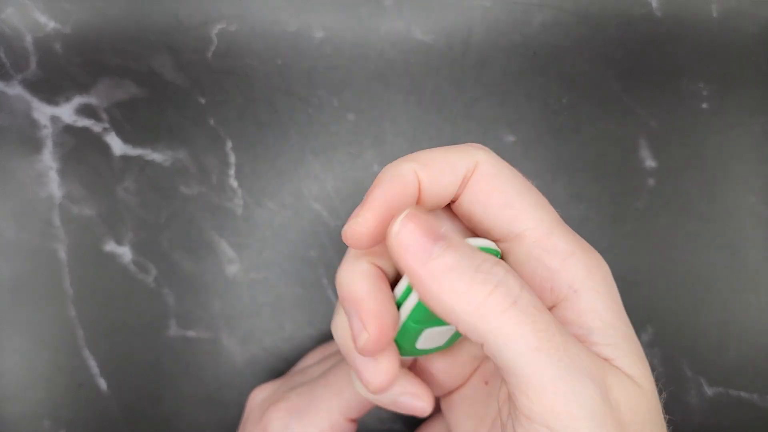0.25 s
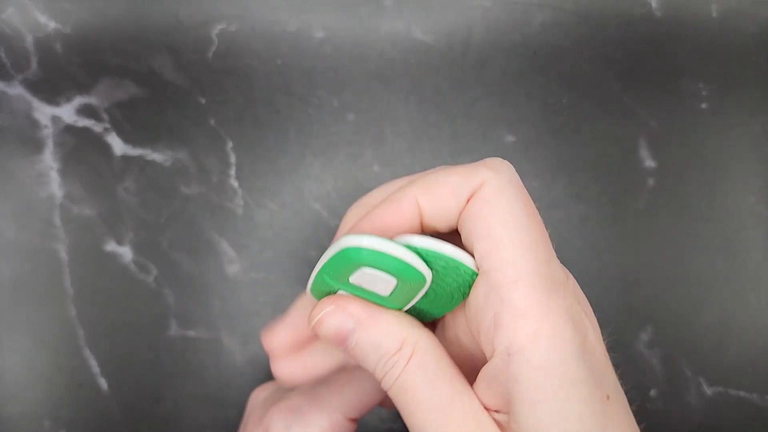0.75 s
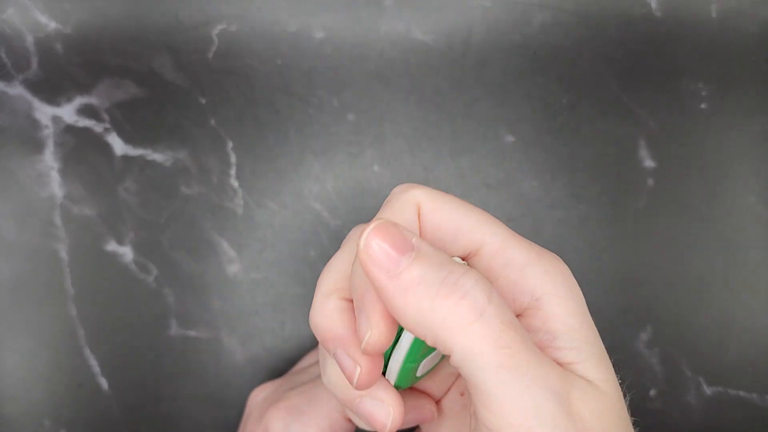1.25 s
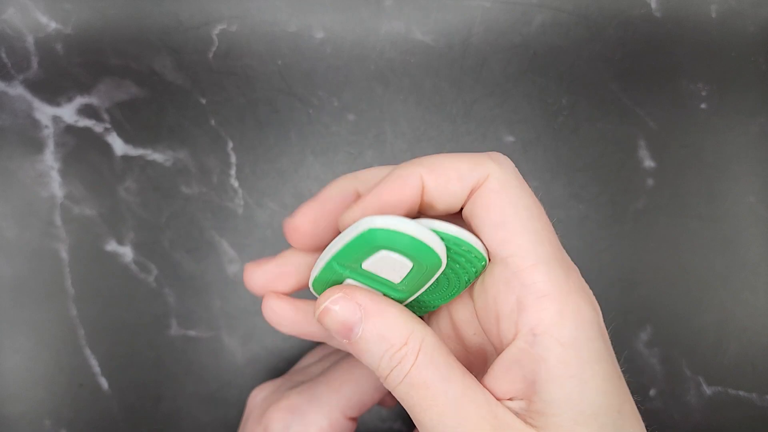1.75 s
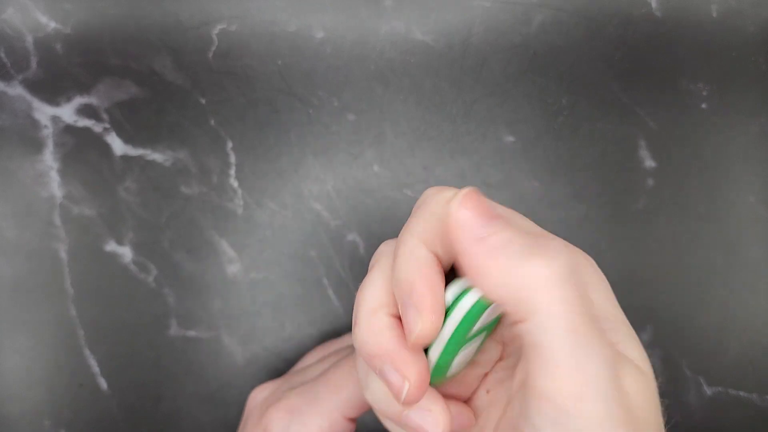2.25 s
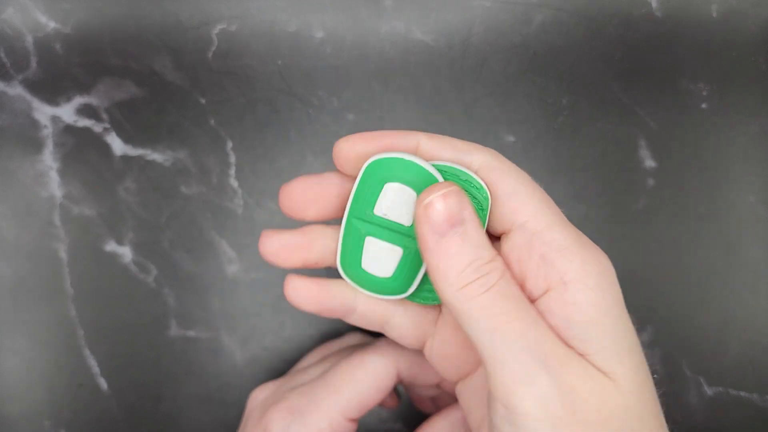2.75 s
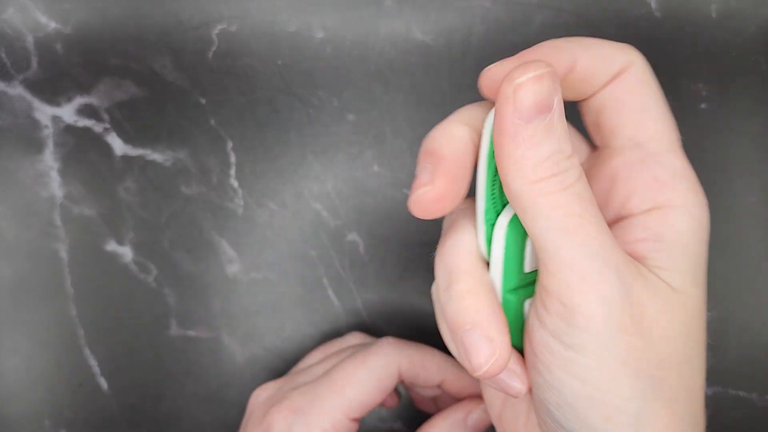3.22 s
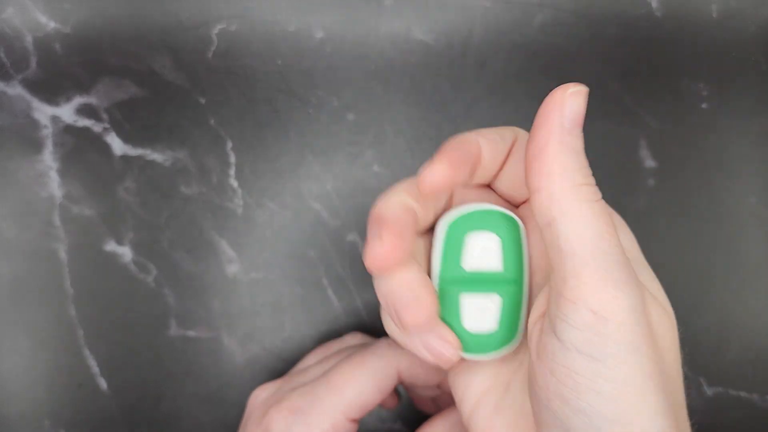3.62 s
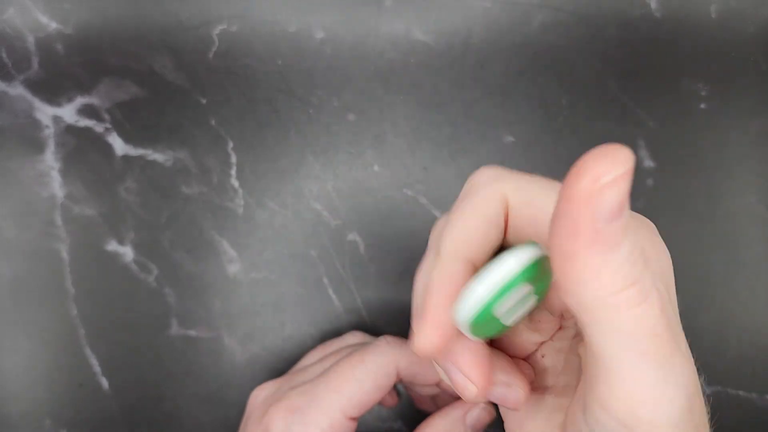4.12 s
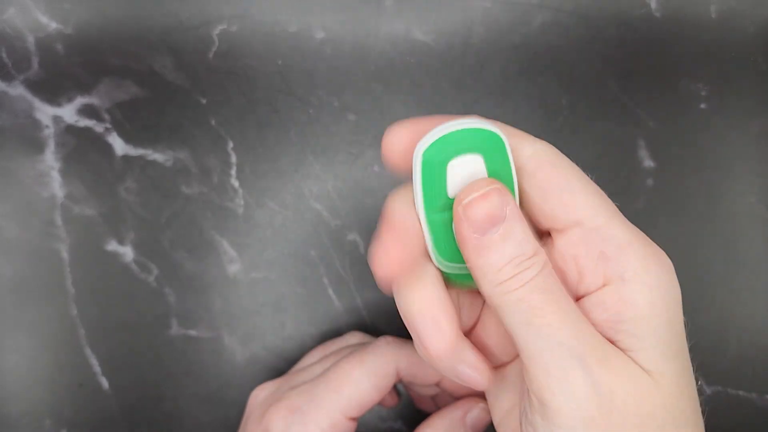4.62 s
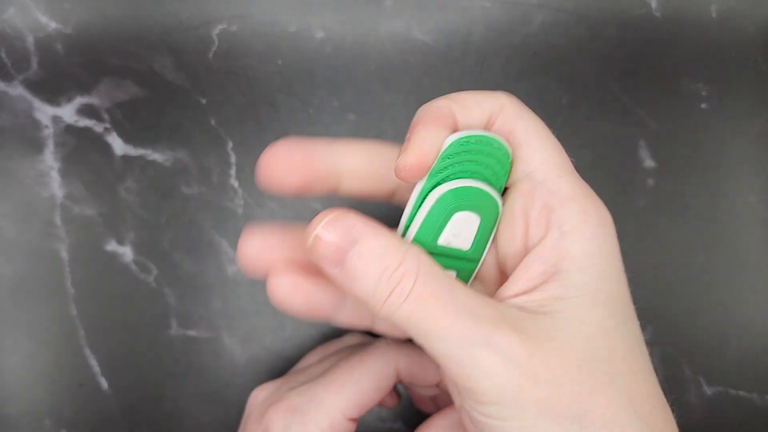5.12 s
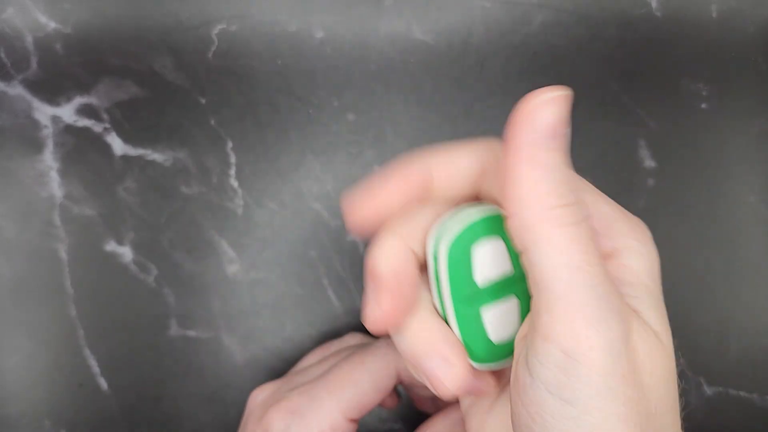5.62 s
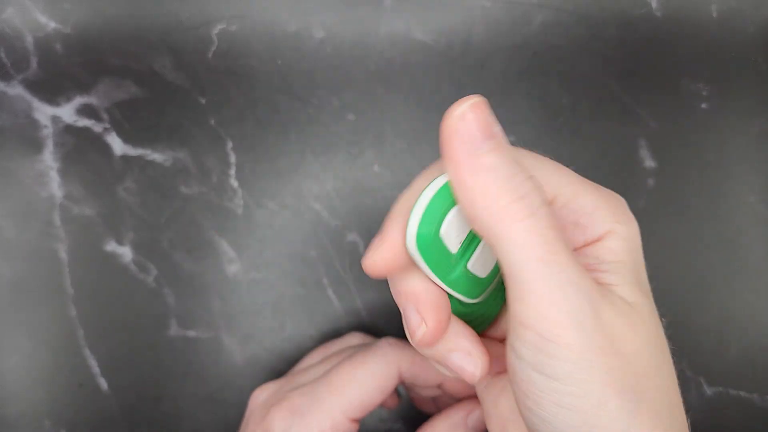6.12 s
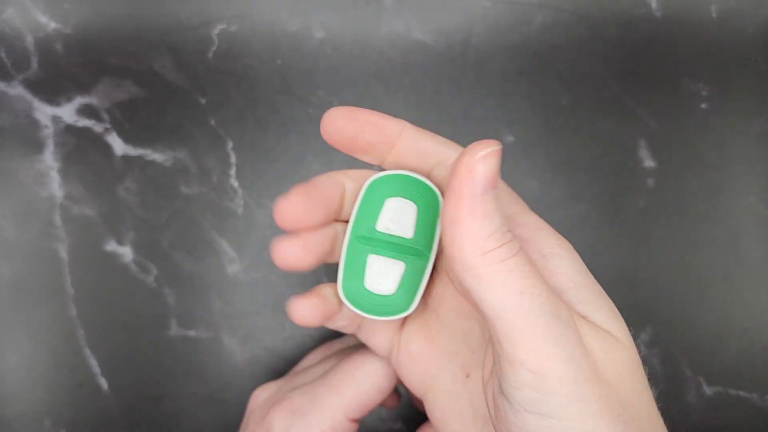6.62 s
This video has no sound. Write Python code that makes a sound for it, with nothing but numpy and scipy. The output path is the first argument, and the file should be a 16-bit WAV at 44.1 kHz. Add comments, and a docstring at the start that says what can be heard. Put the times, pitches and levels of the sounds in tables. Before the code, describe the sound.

A hand-held magnetic plastic slider snaps sharply again and again, with short scrapes and gritty rubs, close up in a small quiet room.

```python
"""Hard plastic snaps, each led in by a swelling scrape and followed by brief chatter, with gritty rubs between.
Place: a small, quiet room with a low hum. Distance: a hand's work close to a stereo microphone.
A magnetic fidget slider's ribbed plates scrape, strike and chatter: dense random contacts shaped by resonances.
The fingers rub and tick with longer or fainter strokes of the same grit. The room adds a noise-like tail;
filtered noise makes its rumble and hiss, and steady and wavering tones make the hum."""
import sys
import numpy as np
from scipy import signal
from scipy.fft import rfft, irfft, next_fast_len
from scipy.io import wavfile
from scipy.ndimage import uniform_filter1d

SR = 44100
rng = np.random.default_rng(int(sys.argv[2]) if len(sys.argv) > 2 else 0)


def wav_record(signal):
    """Record a signal, one row per channel, as 16-bit PCM in the file named by sys.argv[1]."""
    frames = np.transpose(np.atleast_2d(signal))
    bounded = np.clip(frames, -1, 1)
    # unit amplitude maps onto the largest positive 16-bit level
    quanta = np.round(bounded * 32767).astype(np.int16)
    wavfile.write(sys.argv[1], SR, quanta)


N = 302997   # length in samples


def from_db(db):
    """Decibels to amplitude gain."""
    return 10 ** (np.asarray(db) / 20)


def rms_one(x):
    """Scale to unit power."""
    return x / np.sqrt(np.mean(x ** 2) + 1e-20)


def at_hz(points, hz):
    """Read a table of (Hz, value) on a log-frequency axis."""
    points = np.array(points)
    return np.interp(np.log(hz + 1), np.log(points[:, 0]), points[:, 1])


def bins(size):
    """Frequencies in Hz of a spectrum of this many samples."""
    return np.arange(size // 2 + 1) * SR / size


def bump(hz, centre_hz, width_hz):
    """Shape of a resonance: 1 on top, one half at half the width to either side."""
    return 1 / (1 + (2 * (hz - centre_hz) / width_hz) ** 2)


def resonate(x, gain_db):
    """Causal (minimum-phase) filter with the given gain per bin, found by folding the cepstrum."""
    size = x.shape[-1]
    cepstrum = irfft(np.log(from_db(gain_db)), size)
    cepstrum[..., 1:size // 2] *= 2
    cepstrum[..., size // 2 + 1:] = 0
    response = np.exp(rfft(cepstrum))
    return irfft(rfft(x) * response, size)


def add(out, x, start_s):
    """Mix x into out from start_s on, trimming what falls outside."""
    start = int(round(start_s * SR))
    first = max(start, 0)
    last = min(start + x.shape[-1], out.shape[-1])
    if last > first:
        out[:, first:last] += x[:, first - start:last - start]


# Spectrum of the room's rumble and hiss, before its overall level is set: pitch_hz [Hz], density_db [dB per Hz]
AIR_SPECTRUM = [(20, -8), (45, -9.5), (80, -8.5), (105, -9), (150, -6), (230, -10.5), (300, -22.5),
                (400, -20), (1000, -34.5), (1550, -35), (2400, -50.5), (5500, -51.5), (10500, -61.5),
                (16000, -60.5)]
# Likeness of that noise at the two microphones: pitch_hz [Hz], correlation [0-1]
AIR_CORRELATION = [(30, 0.71), (100, 1), (180, .8), (350, 0.16), (1000, 0.093), (16000, 0.0064)]
# Tones of the distant motor: pitch_hz [Hz], level_db [dB, halfway through], steady_share [of power, 0-1]
HUM_TONES = [(59.11, -51.5, 0.87), (163.4, -61, 0.08), (348.3, -71, 0.02)]
AIR_DB = -53
HUM_FADE_DB_PER_S = .5   # the hum slowly grows fainter


def background():
    """Low rumble and faint hiss of the room as filtered noise, with the wavering hum of a distant motor."""
    size = 2 * next_fast_len(N // 2 + 1)
    hz, t = bins(size), np.arange(N) / SR
    mid, side = rfft(rng.standard_normal((2, size)))
    alike = np.clip(at_hz(AIR_CORRELATION, hz), 0, 1)
    both = np.sqrt(1 + alike) * mid + np.sqrt(1 - alike) * side * [[1], [-1]]
    air = rms_one(irfft(both * from_db(at_hz(AIR_SPECTRUM, hz)), size)[:, :N])
    hum = 0
    for pitch_hz, level_db, steady_share in HUM_TONES:
        narrow_noise = rfft(rng.standard_normal(size)) * bump(hz, pitch_hz, width_hz=13)
        waver = rms_one(irfft(narrow_noise, size)[:N])
        steady_share = np.clip(steady_share, 0, 1)
        tone = np.sqrt(2 * steady_share) * np.sin(2 * np.pi * pitch_hz * t)
        hum = hum + from_db(level_db) * (tone + np.sqrt(1 - steady_share) * waver)
    fade = from_db(-HUM_FADE_DB_PER_S * (t - t.mean()))
    return from_db(AIR_DB) * air + hum * fade


# How long the room's tail takes to fall by 60 dB, before the early boost: pitch_hz [Hz], decay_s [s]
ROOM_DECAY = [(300, 0.0152), (1500, 0.2861), (3000, 0.3453), (5000, 0.368), (8000, 0.3029), (12000, 0.2004),
              (16000, 0.199)]
# Colour of the room's tail: pitch_hz [Hz], level_db [dB]
ROOM_TONE = [(200, -5.5), (1000, -2.5), (2500, -3.5), (5000, -2.5), (9000, -4), (16000, 1.5)]


def room_response(size=32768):
    """Diffuse reflections as decaying noise bands, strongest early on from the table top."""
    t, hz = np.arange(size) / SR, bins(size)
    white = rfft(rng.standard_normal((2, size)))
    tail = 0
    edges_hz = np.linspace(80, 17000, 45)
    for low, high in zip(edges_hz, edges_hz[1:]):
        centre = (low + high) / 2
        band = irfft(white * ((hz >= low) & (hz < high)), size)
        decay_db = -60 * t / at_hz(ROOM_DECAY, centre)
        tail = tail + band * from_db(at_hz(ROOM_TONE, centre) + decay_db)
    build_up = np.clip((t - .003) / .012, 0, 1)
    early = 1 + 3.5 * np.exp(-t / 0.026)
    return tail * build_up * early / np.sqrt(SR * 0.04543)


# Resonances of the plastic plates: pitch_hz [Hz], width_hz [Hz], lift_db [dB]
PLATE_RESONANCES = [(960, 70, 3), (1519, 180, 7.5), (2300, 140, -2.5), (2900, 150, 3.5), (3400, 90, 0),
                    (3845, 52, 2.5), (4400, 67, 0.5), (4690, 30, 1.5), (5495, 260, 4), (5907, 29, 5.5),
                    (6295, 95, 4.5), (7223, 310, 6), (7687, 490, 3), (8380, 130, 6), (9407, 78, 7),
                    (11800, 69, 6.5), (13450, 300, 1.5), (14700, 120, 4.5)]


def plate_db(hz):
    """Lift in dB given by the resonances of the plates."""
    return sum(lift_db * bump(hz, pitch_hz, width_hz) for pitch_hz, width_hz, lift_db in PLATE_RESONANCES)


def contacts(size, grain_db, clump_db, channels=3):
    """Dense tiny collisions of uneven strength, bunched where the ribs catch."""
    sizes = from_db(grain_db * np.clip(rng.standard_normal((channels, size)), -2, 2))
    catches = rms_one(uniform_filter1d(rng.standard_normal(size), size=40))
    bunching = from_db(clump_db * np.clip(catches, -2.5, 2.5))
    return rms_one(rng.choice([-1, 1], (channels, size)) * sizes * bunching)


def at_microphones(x, pan_db, lag_s, scatter):
    """With a positive lag the left microphone hears first; the hand scatters sound differently to each."""
    direct = np.array([x[0], np.roll(x[0], int(lag_s * SR))])
    gains = from_db(np.array([[.5], [-.5]]) * pan_db)
    return (direct + scatter * x[1:]) * gains / np.sqrt(np.mean(gains ** 2))


# Plates and fingers rubbing: middle_s [s], length_s [s from the middle until about 10 dB down],
# level_db [dB, before the swell and fade], pitch_hz [Hz, centre of the grit before the plates colour it]
RUB_STROKES = [(0.676, 0.0052, -49.5, 5630), (1.02, 0.023, -51.5, 3900), (1.097, .003, -58, 4500),
               (1.119, .016, -53.5, 3400), (2.08, 0.0182, -48, 4106), (1.908, .005, -58, 5960),
               (2.21, 0.0325, -63, 2995), (2.768, 0.0028, -55, 6142), (2.897, 0.0065, -52.5, 5600),
               (3.08, .03, -64, 6200), (3.142, .02, -52, 5680), (3.145, 0.056, -47, 189),
               (3.21, 0.0292, -56.5, 4950), (3.787, 0.0048, -50, 5606), (4.035, 0.0255, -59, 5400),
               (4.802, .005, -54, 5640), (4.89, 0.0205, -53.5, 5130), (4.959, 0.0097, -50, 4600),
               (5.168, 0.0067, -46, 3602), (5.182, 0.0048, -35, 3210), (5.332, 0.00293, -23.5, 4600),
               (5.6, 0.0418, -63, 5744), (6.13, 0.0254, -50, 3112), (6.2229, 0.00227, -26.5, 3800),
               (6.361, 0.0118, -48, 3740)]
# stray ticks as the fingers turn the toy: level and pitch are the middle of their spread
TICKS_PER_S, TICK_S, TICK_DB, TICK_SPREAD_DB, TICK_HZ = 4, 0.0048, -67, 10, 4600


def strokes():
    """The main rubs, and stray ticks at random moments spread over an octave, in the columns of the rubs."""
    all_strokes = list(RUB_STROKES)
    for when, force, pitch in rng.random((int(TICKS_PER_S * N / SR), 3)):
        level_db = TICK_DB + TICK_SPREAD_DB * (force - .5)
        all_strokes.append((when * N / SR, TICK_S, level_db, TICK_HZ * 2 ** (pitch - .5)))
    return all_strokes


def rubs(room, room_db, size=16384):
    """Short gritty strokes of tiny contacts that swell and fade, coloured by the plates."""
    out = np.zeros((2, N))
    t, hz = (np.arange(size) - size // 2) / SR, bins(size)
    for middle_s, length_s, level_db, pitch_hz in strokes():
        octaves = np.log2((hz + 50) / pitch_hz)
        colour = -9 * np.log2(1 + 3.0 * octaves ** 2)
        grains = contacts(size, grain_db=8.5, clump_db=5.5)
        heard = at_microphones(grains, pan_db=13, lag_s=0.00034, scatter=0.58)
        grit = rms_one(resonate(heard, colour + plate_db(hz)))
        swell = np.exp(-1.2 * np.abs(t / length_s) ** 2.2)
        add(out, grit * from_db(level_db) * swell, middle_s - size / 2 / SR)
    reflected = signal.fftconvolve(out.sum(0, keepdims=True), room, axes=1)[:, :N]
    return out + from_db(room_db) * reflected


def snap_force(t, chatter_s, run_db):
    """A swelling slide over the ribs, the blow against the stop at t = 0, then chatter."""
    before, after = np.maximum(-t, 0), np.maximum(t, 0)
    # the plates lift off the ribs for an instant just before they hit
    lift = 1 - np.exp(-(before / .0013) ** 2)
    slide = from_db(run_db + 4.5) * np.exp(-(before / 0.005897) ** 1.05) * lift * (t < 0)
    blow = 0.67 * np.exp(-after / .0009)
    settling = np.maximum(after - chatter_s, 0)   # chatter holds its level, then dies away
    chatter = np.exp(-settling / 0.0036) + 0.62 * np.exp(-settling / 0.0034)
    envelope = slide + (blow + chatter) * (t >= 0)
    return contacts(len(t), grain_db=4.0, clump_db=1.4243) * envelope


# Colour of plastic striking plastic: pitch_hz [Hz], level_db [dB]
CONTACT_COLOUR = [(100, -14.5), (350, -10.5), (1000, -13.5), (1500, -5), (2300, -1.5), (3400, 1.5),
                  (5300, -2.5), (7000, -4.5), (9000, 0.5), (13500, -1), (16000, -4.5)]


def snap(level_db, chatter_s, run_db, low_db, mid_db, top_db, ring_hz, ring_db, hollow_hz, hollow_db, pan_db,
         size=8192):
    """One snap, its blow mid-stretch: the sound at the microphones and the pulse sent out into the room."""
    t, hz = (np.arange(size) - size // 2) / SR, bins(size)
    force = snap_force(t, chatter_s, run_db)
    # the grip damps the plates differently each time and lets one of their resonances stand out
    grip = at_hz([(1600, low_db), (3300, mid_db), (5000, 0.0004), (6400, 0.018), (9000, top_db)], hz)
    ring = ring_db * bump(hz, ring_hz, 0.14 * ring_hz)
    # the air cupped in the hand adds a hollow note
    hollow = hollow_db * bump(hz, hollow_hz, 0.18 * hollow_hz)
    colour = at_hz(CONTACT_COLOUR, hz) + grip + plate_db(hz) + ring + hollow
    # low notes bend round the hand, so they reach both microphones more evenly than the treble
    evenness = at_hz([(700, -.75), (2500, -.5), (5500, -.05), (12000, -0.068)], hz)
    shade = pan_db * evenness * np.array([[.5], [-.5]])
    heard = at_microphones(force, pan_db, lag_s=.00005 * pan_db, scatter=1.0)
    near = resonate(heard, colour + shade - shade[0])
    # summed over all directions, part of the chatter merges into one pulse and the peaks are blunter
    merged = 1.3 * (t == 0) + force[0] / np.sqrt(np.sum(force[0] ** 2))
    far = resonate(merged, colour - 0.39 * ring - 0.097 * hollow)[None]
    energy = from_db(2 * level_db) * .005 * SR   # as if the level lasted 5 ms
    near_gain = np.sqrt(2 * energy / np.sum(near[:, t >= 0] ** 2))
    far_gain = np.sqrt(energy / np.sum(far ** 2))
    return near * near_gain, far * far_gain


# The snaps: blow_s [s], level_db [dB, mean over 5 ms with the same energy from the blow on],
# chatter_s [s before it dies away], run_up_db [dB, relative strength of the slide],
# pan_db [dB, left over right, before the hand evens it out], grip_db [dB, damping of the lows],
# ring_hz [Hz, plate resonance left free], hollow_hz [Hz, hollow of the hand]
SNAP_EVENTS = [(-0.028, -13.5, 0.00132, -18, -0.5, 15, 5580, 3400),
               (0.3672, -12.5, 0.00182, -6.5, 0, 11, 2800, 1100),
               (0.74, -24, 0.00495, -3, 14, 17, 6378, 2706),
               (1.167, -22.5, 0.0051, -16.5, 8, 7, 3670, 2900),
               (1.3561, -12, 0.00354, -9.5, 4.5, 13, 4400, 1380),
               (1.4525, -13, 0.003, -11.5, 5, 12, 14000, 2360),
               (1.791, -21, 0.008, -7.5, 17, 19, 6000, 2750),
               (2.073, -33, 0.0087, -2.5, 13, 9.5, 3980, 3570),
               (2.268, -26.5, 0.00474, -11.5, 14, 6, 5240, 3450),
               (2.42, -14, 0.00192, -7.5, 12.5, 15.5, 5967, 3110),
               (2.4894, -11.5, 0.00466, -7, 0.5, 15, 2550, 2300),
               (2.8104, -22.5, 0.0048, -4.5, 12.5, 16.5, 5260, 3177),
               (3.229, -38, 0.00734, -4, 10, 13, 7500, 2850), (3.5187, -9, .0037, -8, 5, 17, 3720, 693),
               (3.636, -11, 0.00242, -7, 3, 15.5, 4850, 700),
               (4.0815, -17, 0.00136, -10, 16, 31, 5900, 2800),
               (4.1252, -26, 0.007, -1.5, 12.5, 17, 6010, 3410),
               (4.2604, -17, 0.00814, -6, 11, 9, 4550, 690),
               (4.4999, -13.5, 0.00473, -5.5, 2.5, 10.5, 6380, 2740),
               (4.5496, -10, 0.00348, -7, 4.5, 15.5, 13900, 3120),
               (4.8486, -19.5, 0.00196, -11.5, 14, 29.5, 4978, 3400),
               (4.8984, -28, 0.00448, -2.5, 15.5, 14.5, 5120, 780),
               (5.1968, -15.5, 0.00527, -13, 14, 15, 12110, 3500),
               (5.3377, -12.5, .0032, -9, 9, 15, 4850, 3688),
               (5.6812, -11, 0.00448, -6.5, 3.5, 18, 3300, 2650),
               (6.0325, -17, 0.0054, -14, 14.5, 28, 5700, 2985),
               (6.072, -28.5, 0.0061, -2.5, 12, 20.5, 5900, 3220),
               (6.2306, -20, .0014, -13, 16, 11.5, 4090, 1800),
               (6.2369, -20.5, 0.0079, -17.5, 10, 9, 4514, 673),
               (6.3845, -12, 0.00343, -13, 12.5, 23, 5550, 3500),
               (6.6417, -14.5, 0.0022, -17.5, 12.5, 25, 5400, 760),
               (6.7472, -13.5, 0.00583, -10, 6, 15.5, 13800, 1760)]
MID_SHARE, TOP_SHARE = 0.5954, 0.5276   # shares of the grip's damping that reach the lower mids and the top
# harder blows are brighter: lift of the top at full scale before the grip damps it, and per dB of level
TOP_DB, TOP_PER_DB = 8.2, .54
RING_DB, RING_DB_PER_OCTAVE = 11.5, -2   # free resonance at 5 kHz, before pan and grip; higher ones less
# the ring grows as the plate faces the left microphone, and takes a share of the grip's damping
RING_PER_PAN_DB, RING_SHARE = .25, .3
HOLLOW_DB, HOLLOW_DB_PER_OCTAVE = 14.5, -4   # lift of the hand's hollow at 1 kHz; a deeper cup rings more
# turned away from the left microphone, the toy is heard more by way of the room
ROOM_PER_PAN_DB = -0.6853


def snaps(room, room_db):
    """Every snap with its reflections round the room; strength, grip and direction set its colour."""
    out = np.zeros((2, N))
    for blow_s, level_db, chatter_s, run_up_db, pan_db, grip_db, ring_hz, hollow_hz in SNAP_EVENTS:
        top_db = TOP_DB + TOP_PER_DB * level_db - TOP_SHARE * grip_db
        ring_db = RING_DB + RING_DB_PER_OCTAVE * np.log2(ring_hz / 5000)
        ring_db += RING_PER_PAN_DB * pan_db - RING_SHARE * grip_db
        hollow_db = HOLLOW_DB + HOLLOW_DB_PER_OCTAVE * np.log2(hollow_hz / 1000)
        near, far = snap(level_db, chatter_s, run_up_db, -grip_db, -MID_SHARE * grip_db, top_db,
                         ring_hz, ring_db, hollow_hz, hollow_db, pan_db)
        start_s = blow_s - near.shape[-1] / 2 / SR
        reflected = signal.fftconvolve(far, room, axes=1)
        add(out, near, start_s)
        add(out, from_db(room_db + ROOM_PER_PAN_DB * pan_db) * reflected, start_s)
    return out


def scene():
    """The toy in the hand, close to the microphones, in its room."""
    room = room_response()
    return background() + rubs(room, room_db=-16.0) + snaps(room, room_db=-7.0)


def record(dry):
    """The highest peaks are rounded towards 0.9 of full scale and a steep low-pass cuts the top."""
    rounded = dry / (1 + (dry / .9) ** 4) ** (1 / 4)
    low_pass = signal.ellip(10, .2, 70, 15900, fs=SR, output="sos")   # ripple dB, stop dB, cutoff Hz
    return signal.sosfilt(low_pass, rounded)


dry = scene()
out = record(dry)
wav_record(out)
```